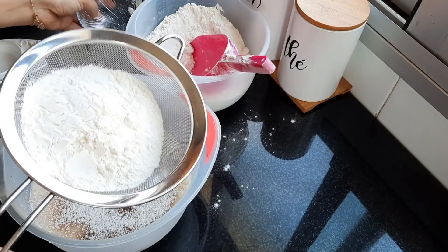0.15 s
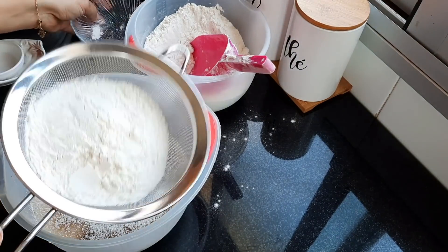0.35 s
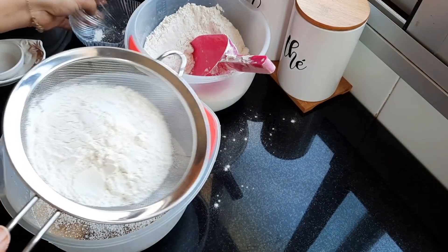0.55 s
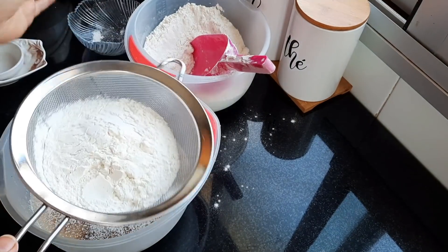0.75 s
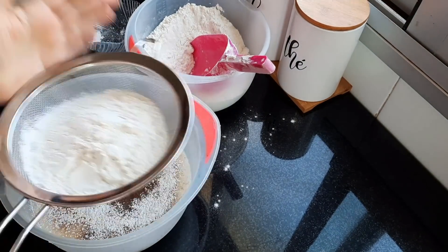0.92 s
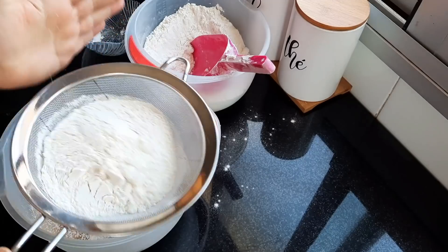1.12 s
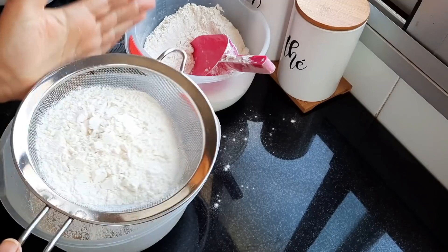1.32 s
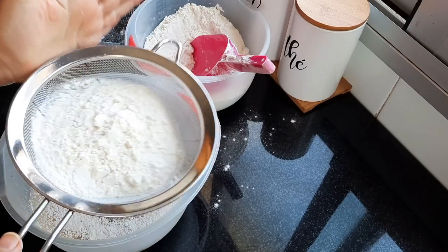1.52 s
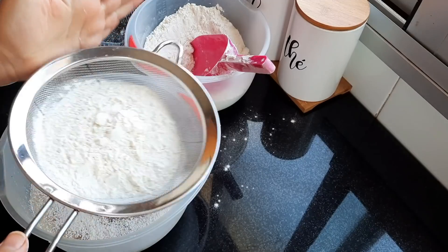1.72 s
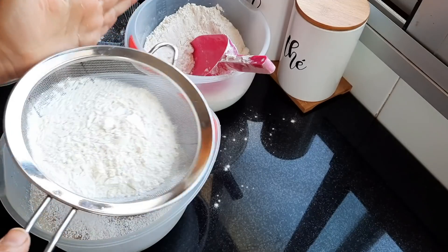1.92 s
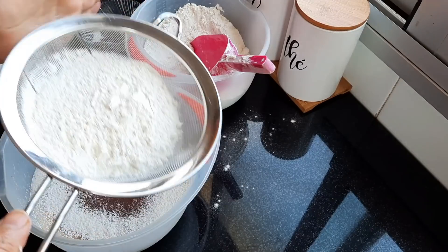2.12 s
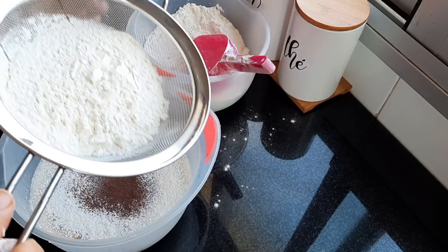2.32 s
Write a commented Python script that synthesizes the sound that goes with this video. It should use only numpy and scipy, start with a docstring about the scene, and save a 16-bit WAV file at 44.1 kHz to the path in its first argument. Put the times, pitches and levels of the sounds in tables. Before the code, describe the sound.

Sharp clink and quick rattles of glass on a steel sieve, followed by faint sifting.

```python
"""One sharp clink, quickening bounces, a soft chatter and a second bright rattle: a glass bowl and a
steel mesh sieve knock together in a small kitchen. Each contact jolts the sieve's frame and mesh,
rings the glass and rim, and thuds through the bowl. Then flour whispers through the shaken sieve,
whose wire rubs faintly on the bowl's edge. A distant motor hums under the room's air."""
import sys
import numpy as np
from scipy import signal
from scipy.fft import rfft, irfft, next_fast_len
from scipy.io import wavfile
from scipy.ndimage import uniform_filter1d, minimum_filter1d

SR = 44100
rng = np.random.default_rng(int(sys.argv[2]) if len(sys.argv) > 2 else 0)


def put_to_file(sound):
    """Save the sound as 16-bit audio at rate SR, in the file named by the first command-line argument."""
    columns = np.atleast_2d(sound).T  # one column per channel
    safe = np.clip(columns, -1, 1)
    whole_steps = np.round(safe * 32767)
    wavfile.write(sys.argv[1], SR, whole_steps.astype(np.int16))


N = 103635

# Sieve-bowl contacts. Each row: start in seconds, knock in dB, ring in dB, clack low-pass in Hz.
CONTACTS = [(0.2467, 5, 4, 7000), (.2505, -9, -6.5, 6014), (.2745, -15, -12, 3897), (.3115, -2, 4.5, 7000),
            (.3442, -2, -1, 7000), (.3635, -7.5, -8.5, 6000), (0.377, -7, -5, 6000),
            (0.3896, -9, -2.5, 6000), (0.398, -8.5, -8.5, 5000), (.407, -7, -5, 5000),
            (.414, -18, -8.5, 4480), (0.4209, -13.5, -10, 4000), (.426, -28.5, -17, 4000),
            (0.4311, -15.5, -27, 3500), (0.446, -23.5, -7.5, 3000), (.496, -18.5, -26, 1840),
            (.502, -15.5, -22, 1600), (.508, -24.5, -27.5, 1477), (.514, -13.5, -32.5, 1500),
            (0.519, -22, -30, 1505), (0.526, -16, -36.5, 1500), (0.5476, -14, -18, 3000),
            (.557, -20, -24, 1607), (.565, -13, -24.5, 1805), (.570, -14, -16, 1600),
            (0.575, -23.5, -25, 1488), (.582, -22.5, -28, 1500), (.602, -11, -16, 1700),
            (.607, -14, -21, 1800), (.616, -10, -1.5, 7000), (.622, -6.5, -8, 6000), (.628, -8, 2.5, 6000),
            (.6355, -12, -7, 7000), (.6455, -10, 5.5, 5984), (0.6505, -12.5, -16, 5870),
            (.658, -14, -1.5, 5000), (.666, -9, 3.5, 5000), (.674, -21.5, -14, 3934),
            (.688, -18, -24, 4010), (.698, -35, -4.5, 3018), (0.709, -34, -28, 3000)]
# Diffuse room sound. Each row: frequency in Hz, left-right coherence from 0 to 1.
ROOM_COHERENCE = [(60, 0.67), (250, .85), (600, 0.33), (2000, .1), (16000, 0.035)]
# Mesh noise and early scatter. Each row: frequency in Hz, left-right coherence from 0 to 1.
SCATTER_COHERENCE = [(300, 1), (1000, .35), (2000, .02), (16000, .02)]
STRIKE_SPREAD_DB = 1


def from_db(db):
    """Decibels to gain."""
    return 10 ** (np.asarray(db) / 20)


def pan(left_over_right_db):
    """Gains for two channels."""
    return from_db([[left_over_right_db / 2], [-left_over_right_db / 2]])


def unit_rms(x):
    """Scale to rms 1."""
    return x / np.sqrt(np.mean(x ** 2) + 1e-20)


def at_hz(points, hz, column=1):
    """Interpolate a table column over log frequency."""
    table = np.array(points)
    return np.interp(np.log(np.maximum(hz, 1)), np.log(table[:, 0]), table[:, column])


def colour(x, spectrum):
    """Minimum-phase filter of the given shape; white noise keeps its power."""
    size = 2 * next_fast_len(N)
    gain = unit_rms(from_db(at_hz(spectrum, np.fft.rfftfreq(size, 1 / SR))))
    cepstrum = irfft(np.log(gain))
    cepstrum[1:size // 2] *= 2
    cepstrum[size // 2 + 1:] = 0
    return irfft(rfft(x, size) * np.exp(rfft(cepstrum)))[..., :N]


def butterworth(x, order, hz, kind):
    """Causal Butterworth filter."""
    return signal.sosfilt(signal.butter(order, hz, kind, fs=SR, output="sos"), x)


def stereo_noise(size, coherence):
    """White noise with the given left-right coherence."""
    mid, side = rfft(rng.standard_normal((2, size)))
    alike = np.clip(at_hz(coherence, np.fft.rfftfreq(size, 1 / SR)), 0, 1)
    return irfft(np.sqrt((1 + alike) / 2) * mid + np.sqrt((1 - alike) / 2) * side * [[1], [-1]], size)


def drift(rate_hz):
    """Straight lines between unit-variance random knots."""
    knots = rng.standard_normal(200)
    return np.interp(np.arange(N) / SR * rate_hz, np.arange(len(knots)), knots)


def decay(t, t60_s):
    """Exponential decay from t = 0, silent before."""
    return from_db(-60 * np.maximum(t, 0) / t60_s) * (t >= 0)


def swell(t, width_s):
    """Gaussian envelope about t = 0; full width at 1/e."""
    return np.exp(-(2 * t / width_s) ** 2)


def resonator(clicks, hz, t60_s):
    """One mode: a unit click starts a decaying sine of height 1."""
    radius, angle = from_db(-60 / (t60_s * SR)), 2 * np.pi * hz / SR
    return signal.lfilter([0, np.sin(angle)], [1, -2 * radius * np.cos(angle), radius ** 2], clicks + 1e-18)


def taps(starts_s, db):
    """Clicks whose strength and sign vary with the spot touched."""
    spread, side = rng.standard_normal((len(starts_s), 2)).T
    clicks = np.zeros(N)
    clicks[(starts_s * SR).astype(int)] = from_db(db - STRIKE_SPREAD_DB * spread) * np.sign(side)
    return clicks


def room_air(level_db=-58.5):
    """Steady room noise, alike in both ears in the bass."""
    # Each row: frequency in Hz, relative density in dB.
    spectrum = [(25, -18.5), (60, -6), (100, -2), (200, -8), (260, -8.5), (340, -4), (450, -10.5),
                (650, -16), (950, -19), (1300, -29), (1750, -22.5), (2400, -35.5), (3000, -34), (3500, -33),
                (4400, -41.5), (6000, -40.5), (8000, -34.5), (9700, -47.5), (15000, -40)]
    return from_db(level_db) * unit_rms(colour(stereo_noise(N, ROOM_COHERENCE), spectrum))


def motor(turn_hz=30.85, wander=0.012, waver_db=3.5, pan_db=-2.64):
    """A distant motor throbs on multiples of its turning rate and swells late."""
    # Each row: multiple of the turning rate, relative level in dB.
    orders = [(2, -13.5), (3, -0.5), (4, -6), (5, -7.5), (6, -5), (7, -10.5), (9, -12.5), (11, -9)]
    # Each row: time in seconds, level in dB.
    envelope = [(0, -63), (.9, -62), (1.35, -57.5), (1.8, -56.5), (2.051, -50.5), (2.28, -48), (2.35, -57)]
    phase = 2 * np.pi * np.cumsum(turn_hz * (1 + wander * drift(rate_hz=7.4))) / SR
    hum = 0
    for order, db in orders:
        gain = from_db(db + waver_db * drift(rate_hz=12))
        hum += gain * np.cos(order * phase + rng.uniform(0, np.pi / 2))
    level_db = np.interp(np.arange(N) / SR, *np.transpose(envelope))
    return from_db(level_db) * unit_rms(hum) * pan(pan_db)


def wire_rubs(band_hz=480):
    """Wire on the bowl's edge: friction noise in one narrow resonance."""
    # Each row: centre in seconds, width in seconds, level in dB, resonance in Hz.
    rubs = [(1.477, .08, -77.5, 5100), (2.074, 0.11, -80.5, 5000), (2.187, 0.15, -74.5, 4750)]
    t, out = np.arange(N) / SR, 0
    for centre_s, width_s, db, hz in rubs:
        friction = butterworth(rng.standard_normal((2, N)), 1, [hz - band_hz / 2, hz + band_hz / 2], "band")
        out += from_db(db) * swell(t - centre_s, width_s) * unit_rms(friction)
    return out


def sieve_rustle(level_db=-61.5, end_s=1.063, fade_s=0.11):
    """Soft rustle as the sieve is brought to the bowl."""
    # Each row: frequency in Hz, relative density in dB.
    spectrum = [(100, -6), (300, 1.5), (500, 5), (1000, -6), (2000, -12), (4000, -15.5), (8000, -12.5),
                (9700, -30), (12000, -16.5), (15500, -22)]
    envelope = from_db(level_db) * np.clip((end_s - np.arange(N) / SR) / fade_s, 0, 1)
    return envelope * colour(stereo_noise(N, ROOM_COHERENCE), spectrum)


def flour():
    """Flour hisses through the mesh on each shake."""
    # Each row: centre in seconds, width in seconds, level in dB.
    shakes = [(1.03, 0.066, -74), (1.127, .06, -73.5), (1.242, .06, -69), (1.329, 0.078, -73),
              (1.469, 0.071, -76.5), (1.56, 0.1, -73.5), (1.679, 0.056, -68.5), (1.78, 0.11, -73),
              (1.924, 0.11, -70), (2.025, .06, -73.5), (2.118, 0.1, -70.5)]
    # Each row: frequency in Hz, relative density in dB.
    spectrum = [(500, -7), (1800, -10), (3000, -10), (5800, 1), (7200, 9), (8500, 16), (9400, -13),
                (10800, 0), (12000, 11), (15500, -8)]
    t = np.arange(N) / SR
    envelope = sum(from_db(db) * swell(t - centre_s, width_s) for centre_s, width_s, db in shakes)
    return envelope * colour(rng.standard_normal((2, N)), spectrum)


def bowl_note():
    """The glass rings on its lowest note when it swings free of the sieve."""
    # Each row: start in seconds, level in dB, frequency in Hz, T60 in seconds.
    free_rings = [(.4315, -35, 927, .28), (.674, -46.5, 910, 1.1)]
    t = np.arange(N) / SR
    return sum(from_db(db) * np.sin(2 * np.pi * hz * (t - start_s)) * decay(t - start_s, t60_s)
               for start_s, db, hz, t60_s in free_rings)


def bowl_thud(gain_db=-37, t60_s=0.057, knock_share=0.53, pan_db=2.5):
    """The knocks shake the bowl and counter, low and dull."""
    # Each row: frequency in Hz, relative density in dB.
    spectrum = [(30, -23.5), (70, -5), (110, -1.5), (180, -3.5), (240, -5.5), (300, 2), (420, 1.5),
                (700, 2.5), (900, -3), (1500, -25), (4000, -49.5)]
    t = np.arange(N) / SR
    power = sum((from_db(knock_share * knock_db) * decay(t - start_s, t60_s)) ** 2
                for start_s, knock_db, _, _ in CONTACTS)
    shake = colour(np.sqrt(power) * stereo_noise(N, ROOM_COHERENCE), spectrum)
    return from_db(gain_db) * shake * pan(pan_db)


def sieve_clack(rise_s=0.00029, mesh_db=-13, mesh_t60_s=0.036, radiate_above_hz=430, pan_db=2):
    """Each contact jolts the damped frame and the dense wire mesh; softer contacts are duller."""
    # Each row: frequency in Hz, relative level in dB, T60 in seconds.
    frame_modes = [(297.6, -29.5, 0.12), (410, -24, .035), (520, -23.5, 0.026), (666.2, -19, 0.018),
                   (1049.7, -21.5, 0.062), (1227, -15.5, 0.02), (1415.6, -10, 0.029), (1646, -18.5, 0.021),
                   (1872, -14, 0.021), (2210, -15, 0.0099), (2850, -24.5, 0.0064), (4085, -25, .012)]
    # Each row: frequency in Hz, relative density in dB.
    mesh_spectrum = [(100, -34.5), (220, -27.5), (300, -5.5), (500, -7), (800, -1.5), (1100, 0),
                     (1500, -0.5), (2700, -2), (3400, -13), (5000, -23), (6400, -19.5), (7700, -15),
                     (9200, -35.5), (10700, -11.5), (11700, -14), (13200, -12), (14500, -27.5)]
    t = np.arange(SR // 8) / SR
    attack = 1 - np.exp(-t / rise_s)
    frame, mesh = np.zeros((2, 2, N))
    for start_s, knock_db, _, cutoff_hz in CONTACTS:
        modes = 0
        for k, (hz, db, t60_s) in enumerate(frame_modes):
            gain = (-1) ** k * from_db(db - STRIKE_SPREAD_DB * rng.standard_normal((2, 1)))
            modes += gain * np.sin(2 * np.pi * hz * t) * decay(t, t60_s)
        crash = from_db(mesh_db) * stereo_noise(len(t), SCATTER_COHERENCE) * decay(t, mesh_t60_s)
        start = int(start_s * SR)
        for track, hit in (frame, modes), (mesh, crash):
            softened = butterworth(hit * attack, 2, cutoff_hz, "low")
            track[:, start:start + len(t)] += from_db(knock_db) * softened
    return butterworth(frame + colour(mesh, mesh_spectrum), 2, radiate_above_hz, "high") * pan(pan_db)


def bowl_clink(half_band=0.11):
    """Clear modes of bowl and rim; each takes up the part of a contact near its own pitch."""
    # Each row: frequency in Hz, relative level in dB, T60 in seconds, left over right in dB.
    modes = [(1046, -45, .2, 1), (1392, -37, .22, 0), (1688, -41, .18, 0), (1903, -42, .15, 0),
             (2164, -55, .4, 0), (3480, -54, .2, 0), (6240, -28, .03, -1), (6302, -32, .16, -2),
             (6350, -30, .025, -1), (9825, -46, .04, 0), (10380, -39, .03, 3), (10780, -32, .035, 2),
             (10880, -34, .02, 1), (12480, -38, .03, 1), (12643, -40, .07, 2), (12950, -36, .025, 0),
             (13360, -37, .025, 0), (15581, -34, .05, -3), (15660, -36, .03, -3)]
    starts_s, _, ring_db, _ = np.transpose(CONTACTS)
    out = 0
    for hz, db, t60_s, pan_db in modes:
        band_hz = [hz * (1 - half_band), hz * (1 + half_band)]
        drive = butterworth(taps(starts_s, ring_db + db), 1, band_hz, "band")
        out += resonator(drive, hz, t60_s) * pan(pan_db)
    return out


def kitchen(x, tail_delay_s=0.0037, scatter_db=-5, scatter_t60_s=0.044, right_lag_s=23e-6):
    """Direct sound, quick scatter from the counter, and a tail that dies band by band."""
    # Each row: frequency in Hz, tail gain in dB, T60 in seconds.
    reverb = [(150, -8.5, 0.47), (400, -0.5, 0.39), (1300, -0.5, 0.3), (3000, -2, 0.36), (6300, 3, 0.25),
              (11080, -6.5, .27), (16000, 4.5, 0.15)]
    t, edges_hz = np.arange(SR // 2) / SR, np.geomspace(100, 17000, 12)
    white = [stereo_noise(len(t), ROOM_COHERENCE) for _ in range(2)]
    tail = 0
    for k, (low_hz, high_hz) in enumerate(zip(edges_hz, edges_hz[1:])):
        hz = np.sqrt(low_hz * high_hz)
        envelope = decay(t - tail_delay_s, at_hz(reverb, hz, column=2))
        band = butterworth(white[k % 2], 2, [low_hz, high_hz], "band")
        tail += from_db(at_hz(reverb, hz)) * band * envelope / np.linalg.norm(envelope)
    scatter = stereo_noise(len(t), SCATTER_COHERENCE) * decay(t, scatter_t60_s)
    echoes = tail + from_db(scatter_db) * scatter / np.linalg.norm(scatter[0])
    right = np.interp(np.arange(N) - right_lag_s * SR, np.arange(N), x[1])
    return np.array([x[0], right]) + signal.fftconvolve(x, echoes, axes=1)[:, :N]


def scene():
    """Knocks in the kitchen, then sifting, over the quiet background."""
    knocks = kitchen(sieve_clack() + bowl_clink() + bowl_thud())
    return knocks + bowl_note() + sieve_rustle() + flour() + wire_rubs() + motor() + room_air()


def record(dry):
    """Smooth peak limiter, then a steep low-pass."""
    ceiling, smooth_s, cutoff_hz = 0.97, 0.004, 15900
    size = int(smooth_s * SR)
    allowed = ceiling / np.maximum(np.abs(dry).max(axis=0), ceiling)
    gain = uniform_filter1d(minimum_filter1d(allowed, 2 * size), size)
    return signal.sosfilt(signal.ellip(10, 0.2, 80, cutoff_hz, fs=SR, output="sos"), gain * dry)


dry = scene()
out = record(dry)
put_to_file(out)
```